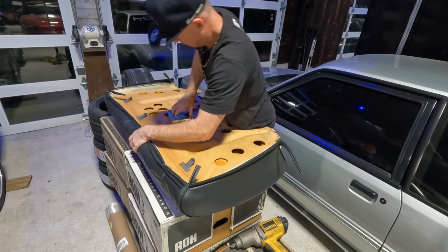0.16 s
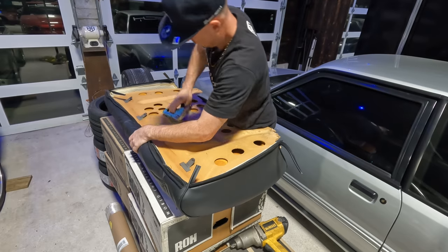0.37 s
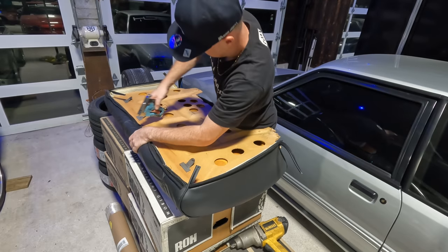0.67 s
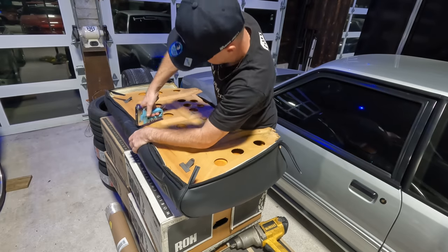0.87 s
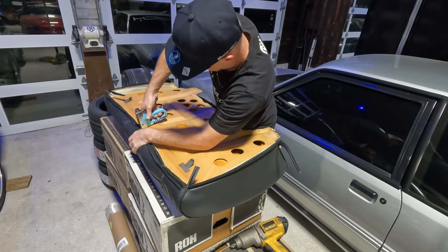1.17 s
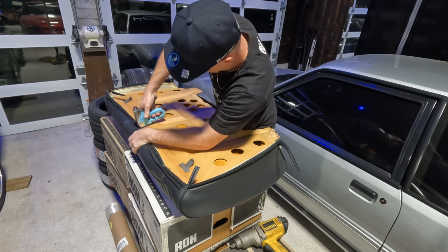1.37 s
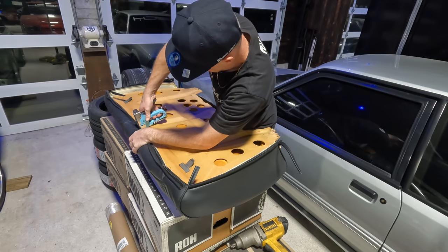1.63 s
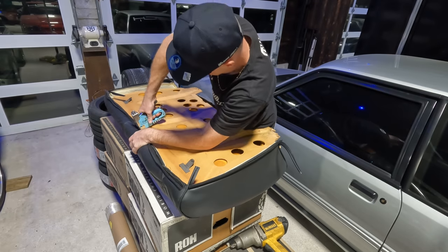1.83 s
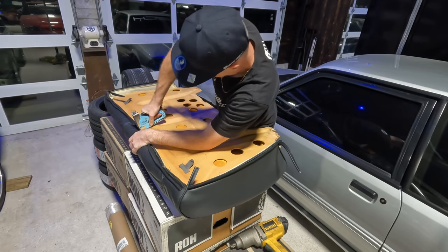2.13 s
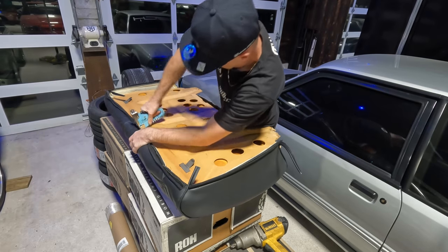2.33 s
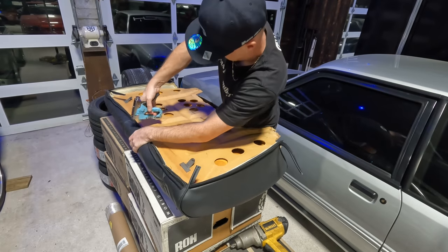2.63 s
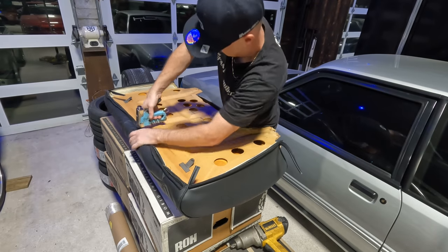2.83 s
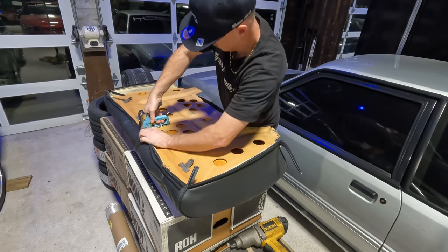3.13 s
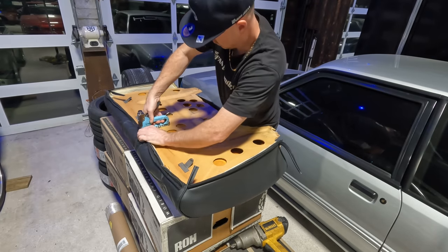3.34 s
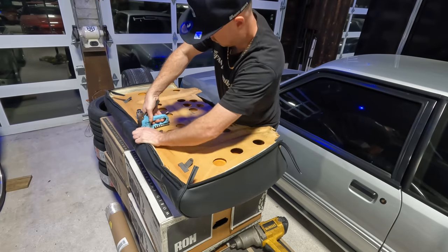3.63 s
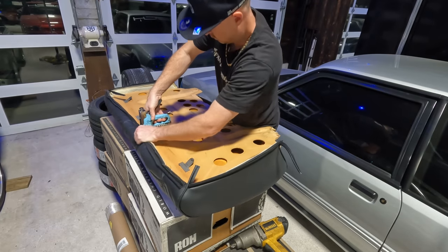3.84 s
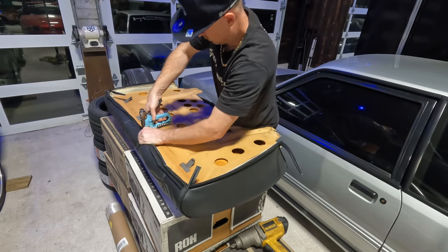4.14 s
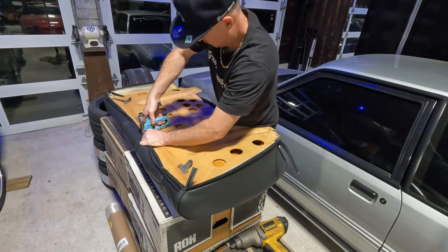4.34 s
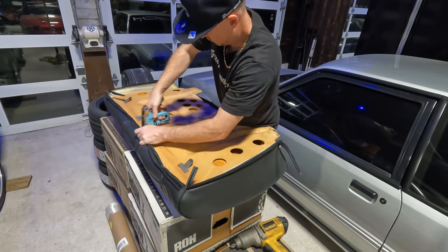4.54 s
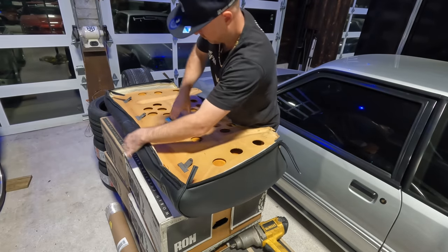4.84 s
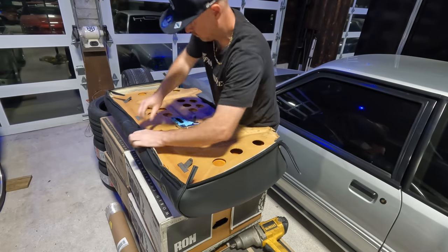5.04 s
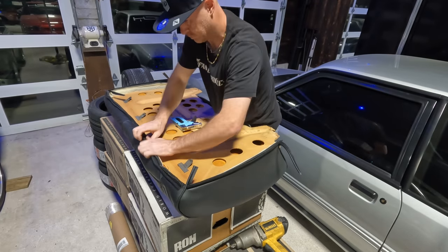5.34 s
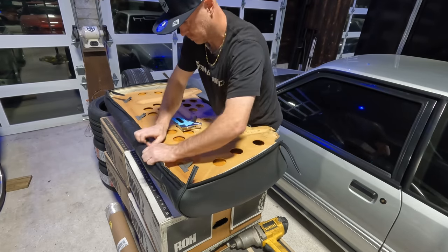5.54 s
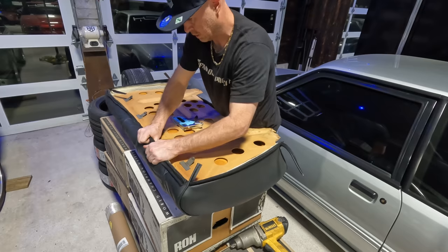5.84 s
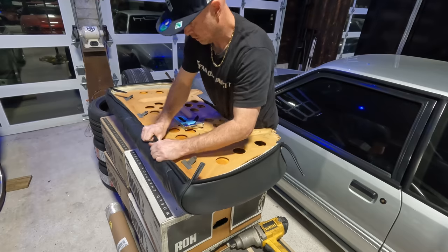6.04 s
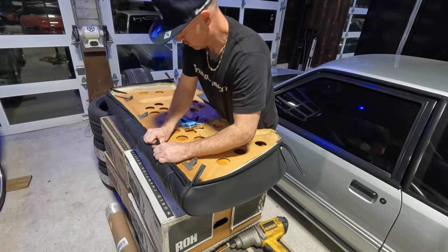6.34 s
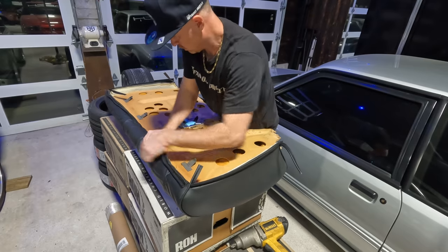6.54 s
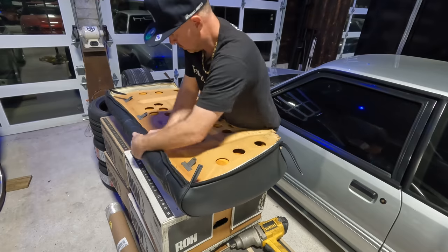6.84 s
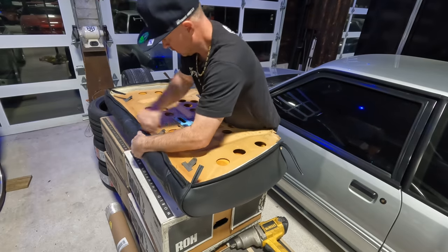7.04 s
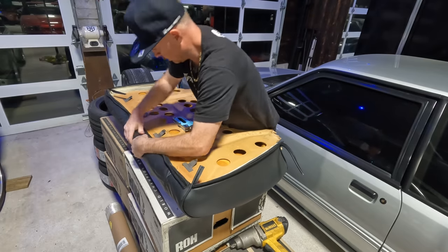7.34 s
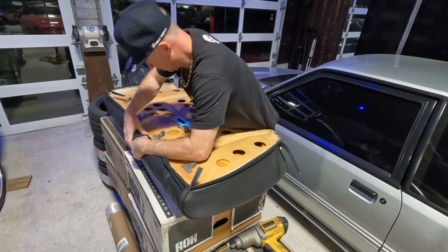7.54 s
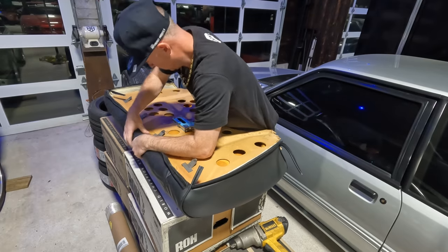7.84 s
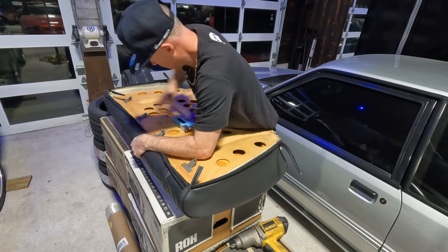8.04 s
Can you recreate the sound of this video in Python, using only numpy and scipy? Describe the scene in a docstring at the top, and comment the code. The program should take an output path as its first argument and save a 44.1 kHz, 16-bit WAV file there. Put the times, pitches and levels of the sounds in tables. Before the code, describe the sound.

A close stereo sound in a garage with low rumble, a soft deep hum, faint hiss and weak short reverberation. From 0.1 to 0.4 s a staple gun shifts on a hollow padded board with small knocks, the last strongest; lighter knocks follow at 0.6, 1.1 and 1.3 s. At 2.13 s steel clacks brightly as it is cocked, and at 2.3 s one hard, loud snap fires with a woody thump. The lever scrapes back until 2.6 s, clicks, and a thin spring hiss fades. Knocks come at 2.8 and 3.1 s, a rattling cluster at 3.6 s, and a dull thump at 4.3 s. From 4.8 to 5.1 s the gun clatters down heavily. After soft rustling, vinyl creaks in rapid grainy slips from 5.8 to 6.6 s, with a few more near 7 s. Light knocks and rubbing at 7.3 and 7.7 s fade out by about 8.2 s.

```python
"""Staple gun on a padded board

A hand staple gun in a garage is set down and shifted on a hollow padded board, cocked, fired once and released.
Hands drag vinyl tight over the board's edge, where it creaks in quick slips; rumble, hum and faint hiss fill the room.
Knocks, clacks and slips are short pushes ringing resonances; rubbing is patchy noise and pulse trains through them.
The lever and the air are noise shaped by spectra, the spring is noise through coil resonances, and noise tails echo.
"""
import sys
import numpy as np
from scipy import signal
from scipy.fft import rfft, irfft, next_fast_len
from scipy.io import wavfile
from scipy.ndimage import uniform_filter1d, map_coordinates

SR = 44100
rng = np.random.default_rng(int(sys.argv[2]) if len(sys.argv) > 2 else 0)


def persist_wave(psi):
    """Save psi, clipped to +-1, as 16-bit WAV."""
    counts = np.round(np.clip(psi, -1, 1) * 32767).astype(np.int16)
    wavfile.write(sys.argv[1], SR, np.atleast_2d(counts).T)


N = 361619  # samples, 8.2 s


def amp(db):
    """Decibel law: the amplitude gain of a level in dB."""
    return 10 ** (np.asarray(db) / 20)


def unit(x):
    """Normalisation of energy: x scaled to rms 1."""
    return x / np.sqrt(np.mean(x ** 2) + 1e-20)


def along(points, hz):
    """Logarithmic frequency scale: (Hz, value) points joined by straight lines over log frequency."""
    f, v = np.transpose(points)
    return np.interp(np.log(hz + 1), np.log(f + 1), v)


def curves(rows):
    """Level envelopes: each column after the time, -120 before the first row and held after the last."""
    s, *columns = np.transpose(rows)
    return [np.interp(np.arange(N) / SR, s, c, -120, c[-1]) for c in columns]


def wobble(rate):
    """Slow random modulation: a smooth curve through normal random knots, rate of them a second."""
    knots = rng.standard_normal(int(N * rate / SR) + 4)
    return map_coordinates(knots, [np.arange(N) * rate / SR])


def filtered(x, response):
    """Linear filtering: the spectrum of x times a complex response of frequency."""
    size = next_fast_len(N + SR // 2)
    return irfft(rfft(x, size) * response(np.fft.rfftfreq(size, 1 / SR)), size)[..., :N]


def coloured(x, spectrum):
    """Spectral shaping: x through a (Hz, dB) curve."""
    return filtered(x, lambda hz: amp(along(spectrum, hz)))


def modal(modes):
    """Modal superposition: the summed response of (Hz, width Hz, dB) resonances, alternating in sign."""
    return lambda f: sum((-1) ** k * amp(db) * 1j * f * w / (c * c - f * f + 1j * f * w)
                         for k, (c, w, db) in enumerate(modes))


def resonant(x, modes):
    """Forced resonance: x through modes, scaled so that a unit pulse peaks at 1."""
    ringing = irfft(modal(modes)(np.fft.rfftfreq(SR, 1 / SR)))
    return filtered(x, modal(modes)) / np.abs(ringing).max()


def spot(modes, hz, loss_db, share):
    """Modal excitation: a contact favours modes near hz (loss_db at an octave) in a band share * hz wide."""
    band = modal([(hz, share * hz, 0)])
    return lambda f: band(f) * sum(modal([(c, w, db - loss_db * np.log2(c / hz) ** 2)])(f)
                                   for c, w, db in modes)


def soft(hz):
    """Contact compliance: a yielding contact has no hard edge, a second-order low-pass."""
    return lambda f: 1 / (1 + 1j * f / hz) ** 2


def add(track, s, sound):
    """Superposition: mixes a sound in at s seconds."""
    part = track[round(s * SR):][:len(sound)]
    part += sound[:len(part)]


def burst(t60, rise=0.0001):
    """Transient excitation: noise of energy 1 decaying exponentially over t60, cut off at 0.05 s."""
    t = np.arange(SR // 20) / SR
    puff = amp(-60 * t / t60) * (1 - np.exp(-t / rise)) * rng.standard_normal(len(t))
    return puff / np.linalg.norm(puff)


def strike(push, *responses):
    """Impulse response: a push through a chain of responses, scaled so that the sound peaks at 1."""
    size = 8192
    hz = np.fft.rfftfreq(size, 1 / SR)
    chain = np.prod([response(hz) for response in responses], axis=0)
    sound = irfft(rfft(push, size) * chain)[:size * 3 // 4]
    return sound / np.abs(sound).max()


# Treble spectrum of hard contacts. Each row: frequency in Hz, relative level in dB.
CLICK_SPECTRUM = [(1760, -14.5), (3200, -2), (5300, -5.5), (7500, -11.5), (10800, -19), (14000, -29.5),
                  (15500, -75.5)]


def tick(t60, tilt_db=0):
    """Hard contact: a very short burst of treble, tilted by tilt_db an octave."""
    return strike(burst(t60, 0.00036), lambda hz: amp(along(CLICK_SPECTRUM, hz) + tilt_db * np.log2(hz + 1)))


def patchy(depth_db):
    """Surface roughness: noise whose colour shifts in small patches, as an uneven surface gives it."""
    z = signal.stft(rng.standard_normal(N), nperseg=256)[2]
    field = rng.standard_normal(z.shape)
    field = uniform_filter1d(field, size=3, axis=0)  # patches over frequency
    field = uniform_filter1d(field, size=6, axis=1)  # and over time
    return signal.istft(z * amp(depth_db * unit(field)), nperseg=256)[1][:N]


def grains(rate, spread_db):
    """Relaxation oscillation: one-sided pulses at an uneven pace, sizes scattered, the train at rms 1."""
    count = np.floor(np.cumsum(rate / SR * amp(4.5 * wobble(150))))
    sizes = amp(spread_db * rng.standard_normal(N))
    return -unit(np.diff(count, prepend=0) * sizes)


# How unlike the two ports hear diffuse sound. Each row: frequency in Hz, side signal as a share of the mid.
SIDE_SHARE = [(30, 0.76), (200, 0.16), (1000, 0.49), (8000, 0.72), (12000, 1.5)]


def ports(pair):
    """Diffuse-field coherence: shared mid plus or minus an independent side give left and right."""
    size = pair.shape[1]
    side = irfft(rfft(pair[1]) * along(SIDE_SHARE, np.fft.rfftfreq(size, 1 / SR)), size)
    return np.array([pair[0] + side, pair[0] - side])


# Rumble and hiss of the room. Each row: frequency in Hz, relative level in dB.
AIR_SPECTRUM = [(8, -8), (24, -5), (53, -3.5), (93, -37), (147, -7.5), (193, -13.5), (267, -16), (570, -30),
                (856, -37), (1280, -26), (3900, -47), (6340, -40.5), (8780, -41.5), (11800, -45),
                (15500, -76)]
AIR_DB, HUM_DB, HUM_HZ = -59.5, -52.5, 30  # middle of the wavering rms level, of the hum's peak, and its pitch


def air():
    """Partly coherent background noise: shaped rumble and hiss, with a wavering hum alike in both ports."""
    noise = ports(coloured(rng.standard_normal((2, N)), AIR_SPECTRUM))
    phase = 2 * np.pi * HUM_HZ * np.arange(N) / SR + 0.57 * wobble(1.0)
    hum = amp(HUM_DB + 0.88 * wobble(3.5)) * np.sin(phase)
    return amp(AIR_DB + 2 * wobble(1.1)) * unit(noise) + hum


def swell(start, length, rise, t60):
    """Exponential build-up and decay: power that rises, holds for length and dies away."""
    t = np.arange(N - round(start * SR)) / SR
    t = t[t < length + 1]
    fade = amp(-60 * np.maximum(t - length, 0) / t60)
    return ((1 - np.exp(-t / rise)) * fade) ** 2


# Hands, gun and vinyl rubbing over the board, with the cocking lever's hiss and the recoil's drumming.
# Each row: start in seconds, length in seconds, scrape in dB, drumming in dB, rustle in dB, share of the
# scrape's power that goes into slips (0-1).
STROKES = [(0.113, 0.22, -72, -64, -64.5, 0.8), (0.542, 0.15, -66, -72, -67, 0.6),
           (0.71, 0.025, -75, -58, -70, 0.4), (1.496, 0.23, -77, -76, -70.5, 0.6),
           (1.84, 0.37, -71, -89, -67.5, 0.5), (2.124, 0.024, -55, -38.5, -28, 0.1),
           (2.308, 0.075, -51, -33.5, -45, 0.4), (2.549, 0.18, -51, -75, -49, 0.76),
           (2.775, 0.46, -60, -58, -60.5, 0.27), (3.369, 0.35, -63.5, -63, -93, 0.48),
           (3.62, 0.32, -62.5, -54, -61, 0.5), (3.91, 0.12, -44.5, -39.5, -62, 0.06),
           (4.09, 0.053, -48.5, -42, -58, 0.07), (4.211, 0.082, -60.5, -57, -63.5, 0.06),
           (4.301, 0.043, -66, -32, -48.5, 0.1), (4.427, 0.2, -61.5, -53, -66, 0.06),
           (4.627, 0.17, -57.5, -55.5, -60, 0.47), (4.84, 0.16, -53, -38.5, -57.5, 0),
           (5.125, 0.46, -63.5, -72, -56, 0.76), (5.623, 0.17, -52.5, -60.5, -56, 0.44),
           (5.795, 0.43, -42, -41, -62.5, 0.23), (6.134, 0.072, -36.5, -45, -60, 0.45),
           (6.278, 0.15, -56, -42.5, -61.5, 0.1), (6.471, 0.11, -39.5, -38.5, -51.5, 0.72),
           (6.647, 0.13, -86, -63, -80, 0.5), (6.902, 0.14, -45, -45.5, -53.5, 0.15),
           (7.205, 0.056, -60.5, -52.5, -61.5, 0), (7.293, 0.011, -39, -34.5, -43.5, 0.17),
           (7.37, 0.24, -64.5, -63.5, -64.5, 0.3), (7.677, 0.065, -52, -54, -62.5, 0.07),
           (7.82, 0.082, -51.5, -48.5, -56.5, 0.33), (7.917, 0.044, -72, -66, -63.5, 0.3),
           (8.048, 0.2, -72.5, -72, -78, 0.44)]
# Unrest after a knock, first chatter, then drumming. Each row: level in dB relative to the knock (chatter)
# or thump (drumming), decay t60 in seconds.
SHUDDER = [(-16.5, 0.12), (-13, 0.16)]
# Hands lying on the work, a single row: scrape in dB, drumming in dB, rustle in dB.
RESTING = (-85.5, -77.5, -78.5)
STROKE_RISE_S, STROKE_T60_S, CONTACT_RISE_S = 0.019, 0.29, 0.003


def rubbing():
    """Addition of powers: amplitudes of slips, scrape, drumming and rustle from strokes, knocks and resting."""
    power = np.zeros((4, N))
    slips, scrape, drumming, rustle = power
    power[1:] += amp(RESTING)[:, None] ** 2
    for s, length, scrape_db, drum_db, rustle_db, grip in STROKES:
        shape = swell(s, length, STROKE_RISE_S, STROKE_T60_S)
        add(slips, s, grip * amp(2 * scrape_db) * shape)
        add(scrape, s, (1 - grip) * amp(2 * scrape_db) * shape)
        add(drumming, s, amp(2 * drum_db) * shape)
        add(rustle, s, amp(2 * rustle_db) * shape)
    (chatter_db, chatter_t60), (after_db, after_t60) = SHUDDER
    for s, thump_db, _, _, knock_db, _, _ in KNOCKS:
        add(scrape, s, amp(2 * (knock_db + chatter_db)) * swell(s, 0, CONTACT_RISE_S, chatter_t60))
        add(drumming, s, amp(2 * (thump_db + after_db)) * swell(s, 0, CONTACT_RISE_S, after_t60))
    return np.sqrt(power)


# The hollow board's low, middle and high groups of modes. Each row: frequency in Hz, width in Hz,
# relative level in dB.
BOARD_MODES = [
    [(158, 34, -1.5), (219.6, 41.5, 6.5), (269.5, 30.2, 7), (333, 28, -2.5)],
    [(398, 80, -6.5), (514, 89, -9.5), (661, 92, -7.5)],
    [(920, 450, 9), (1038, 120, 7.5), (1300, 960, -3), (1690, 130, -5), (2005, 94, 2.5), (2420, 460, -3),
     (3060, 730, -5.5)],
]


def drumming(amount):
    """Forced vibration: patchy noise drives the hollow board's low and middle modes."""
    low, middle, _ = BOARD_MODES
    return amount * amp(0.77 * wobble(25)) * unit(resonant(patchy(depth_db=2.0), low + middle))


# Board and cover under friction. Each row: frequency in Hz, width in Hz, relative level in dB.
RUBBED_MODES = [(625, 220, -11), (1056, 167, 5), (1464, 640, -0.5), (2170, 660, -4), (3230, 1900, -14.5)]
# Treble of the rustle. Each row: frequency in Hz, relative level in dB.
RUSTLE_SPECTRUM = [(1760, -11.5), (3000, -7), (4100, -11), (5150, -5.5), (5850, -8), (6600, -8),
                   (8240, -10.5), (10800, -16), (14000, -24), (15500, -72.5)]


def friction(scrape, rustle):
    """Sliding friction: patchy noise rings board and cover in a fluttering scrape; more of it rustles above."""
    flutter = amp(1.8 * wobble(60))
    scraping = unit(resonant(patchy(depth_db=3.5), RUBBED_MODES))
    rustling = unit(coloured(patchy(depth_db=2.0), RUSTLE_SPECTRUM))
    return flutter * scrape * scraping + rustle * rustling


# The taut vinyl sheet. Each row: frequency in Hz, width in Hz, relative level in dB.
VINYL_MODES = [(940, 320, -3), (1770, 910, 4.5), (2570, 820, 4)]
SLIP_RATE, SLIP_SPREAD_DB = 165, 4.5  # median slips a second, scatter of their sizes


def creak(amount):
    """Stick-slip: a train of small releases, each pulling the sheet and tugging board and cover."""
    tugged = lambda f: modal(VINYL_MODES)(f) + amp(-3.0) * modal(RUBBED_MODES)(f)
    slips = filtered(grains(SLIP_RATE, SLIP_SPREAD_DB), soft(hz=2400))
    return amount * unit(filtered(slips, tugged))


# Gun and hands knocking the board. Each row: time in seconds, thump peak in dB, pitch favoured by the thump
# in Hz, body peak in dB, knock peak in dB, pitch favoured by the knock in Hz, tick peak in dB.
KNOCKS = [(0.134, -60, 190, -63, -49.5, 1580, -49), (0.201, -49.3, 210, -52, -32.5, 1960, -37.5),
          (0.274, -33.5, 297, -46, -30.5, 1340, -43), (0.2932, -36, 240, -40, -34.5, 2030, -35),
          (0.342, -45, 270, -49, -36, 2000, -52), (0.353, -54, 270, -39, -35, 2010, -39),
          (0.364, -23, 288, -24, -18.5, 1580, -30), (0.608, -64, 200, -74, -40.5, 2200, -35.5),
          (0.71, -51, 199, -60, -39, 2630, -39), (0.731, -45, 200, -53, -49, 1620, -60),
          (1.071, -30, 244, -38.5, -29, 1450, -33.5), (1.339, -38, 278, -56, -41.5, 1810, -42),
          (1.518, -51, 222, -68, -45.5, 1580, -52), (2.284, -52, 200, -41, -30, 790, -40),
          (2.294, -39, 256, -22, -20, 825, -35.4), (2.3052, -14.5, 234, -16.5, -10.5, 1110, -9.5),
          (2.824, -38.5, 187, -51, -36, 2040, -39), (2.879, -37, 220, -51, -31, 1700, -33.5),
          (3.11, -26.5, 244, -29.5, -22.5, 1440, -40), (3.594, -47.5, 218, -49.5, -20, 1580, -36),
          (3.607, -29.8, 244, -33.5, -17.5, 1425, -22), (3.628, -38, 210, -36.5, -22.5, 1630, -26),
          (3.673, -33, 240, -32, -20.5, 1294, -32), (3.692, -43, 210, -30, -23.5, 1680, -26),
          (3.763, -37, 205, -35.5, -22.5, 1340, -25), (4.153, -39.5, 230, -42, -29.5, 1240, -45),
          (4.302, -33, 249, -50.5, -34, 1350, -49), (4.328, -16.5, 188, -25, -18, 1350, -28),
          (4.464, -39, 200, -57.5, -54, 1000, -69), (4.549, -35.5, 220, -51, -40.5, 1200, -58),
          (4.679, -51.5, 209, -61, -33, 1990, -37), (4.719, -45, 232, -51, -37, 2160, -32.5),
          (4.831, -21, 218, -26, -19, 1750, -25), (4.854, -34, 186, -39, -26.5, 1720, -33),
          (4.894, -45, 230, -40, -30, 1800, -33), (4.936, -23.5, 220, -30, -17, 1100, -31),
          (4.961, -24, 231, -31, -25, 1400, -32), (4.992, -22, 223, -13, -9.5, 1880, -39),
          (5.0, -13, 200, -27, -12.5, 1340, -13.5), (5.029, -16.5, 228, -39, -17.5, 1310, -38),
          (5.071, -18.5, 297, -22, -17, 900, -25), (5.078, -34, 230, -32.5, -20, 1480, -28),
          (5.38, -65.5, 211, -53, -37, 1930, -44), (6.814, -36, 231, -52, -32, 1390, -46),
          (7.187, -41.1, 192, -67, -43, 1310, -64), (7.245, -38, 229, -50.5, -38, 1320, -53.5),
          (7.311, -37, 240, -41, -30.5, 1930, -27.5), (7.32, -28, 208, -32, -28.5, 1460, -32),
          (7.646, -52, 180, -68, -41.5, 1970, -42.5), (7.699, -32, 220, -40, -37, 1320, -42.5),
          (7.718, -41, 221, -44, -37.5, 1520, -40.5), (7.737, -33, 200.6, -46, -40, 1280, -56),
          (7.845, -44, 220.4, -48, -45, 1324, -61), (7.894, -50, 261, -44, -34.5, 1420, -40),
          (7.915, -41, 189, -34.5, -31.5, 1690, -34.5), (7.969, -38.5, 204, -54, -39.5, 1296, -44),
          (7.997, -38.5, 200, -65, -57, 1546, -59), (8.178, -53, 210, -65.5, -40.5, 1415, -53)]
HARD_HZ, HARD_TILT_DB = 1650, 5  # a knock an octave above this pitch tilts its tick up by so many dB an octave


def knocks():
    """Impact excitation: short pushes ring the board's three groups of modes; hard contact adds treble."""
    out = np.zeros(N)
    low, middle, high = BOARD_MODES
    for s, thump_db, thump_hz, body_db, knock_db, knock_hz, tick_db in KNOCKS:
        thump_spot = spot(low, thump_hz, loss_db=26.5, share=0.54)
        thump = strike(np.abs(burst(0.011, 0.0015)), thump_spot, soft(hz=407))
        body_band = modal([(550, 230, 0)])
        body = strike(np.abs(burst(0.0071, 0.0003)), modal(middle), body_band, soft(hz=1210))
        knock_spot = spot(high, knock_hz, loss_db=20.5, share=0.69)
        knock = strike(burst(0.0035, 0.0003), knock_spot, soft(hz=3220))
        add(out, s, amp(thump_db) * thump)
        add(out, s, amp(body_db) * body)
        add(out, s, amp(knock_db) * knock)
        add(out, s, amp(tick_db) * tick(0.011, HARD_TILT_DB * np.log2(knock_hz / HARD_HZ)))
    return out


# The bench shaken by heavy blows. Each row: time in seconds, peak in dB.
JOLTS = [(0.364, -35), (1.072, -46), (2.305, -35), (3.117, -40), (4.326, -38), (4.372, -33.5), (4.414, -49),
         (4.833, -25.5), (4.993, -22.5), (5.071, -28.5), (6.948, -38), (7.317, -34), (7.703, -37.5),
         (7.734, -41.5), (7.773, -40), (7.86, -41), (7.913, -38)]
# Modes of the bench. Each row: frequency in Hz, width in Hz, relative level in dB.
BENCH_MODES = [(66.4, 30, -4.5), (50.5, 14, -6.5)]


def bench():
    """Low-frequency structural resonance: a shudder of the bench under each heavy blow."""
    out = np.zeros(N)
    for s, db in JOLTS:
        add(out, s, amp(db) * strike(burst(0.12, 0.0049), modal(BENCH_MODES), soft(hz=150)))
    return out


# Steel parts of the gun clacking. Each row: time in seconds, peaks of the low, middle, high and top modes
# in dB (four columns), rattle decay t60 in seconds.
CLACKS = [(1.941, -51, -50.5, -65.5, -55, 0.12), (2.1318, -35.5, -21, -15, -19.5, 0.014),
          (2.142, -18.5, -14, -11.5, -8, 0.025), (2.149, -21.5, -12, -15, -13.5, 0.015),
          (2.164, -43, -30, -25.5, -41.5, 0.011), (2.1999, -28.5, -22, -41.5, -43, 0.088),
          (2.3033, -28.5, -19.5, -22.5, -10.5, 0.022), (2.548, -33.5, -37, -31, -41.5, 0.015),
          (2.5666, -23, -27.5, -38, -31, 0.022), (2.573, -20, -26, -30.5, -38.5, 0.021),
          (2.59, -19, -18.5, -9, -8, 0.0069), (2.729, -33, -26.5, -44, -46, 0.019),
          (2.806, -51.5, -44, -49.2, -52.7, 0.0067)]
# The gun frame's low, middle, high and top groups of modes. Each row: frequency in Hz, width in Hz,
# relative level in dB.
STEEL_MODES = [
    [(1370, 570, 0.5), (1440, 340, 10), (1920, 66, -3.5)],
    [(2560, 680, -3), (3120, 100, 4.5), (3440, 75, -2), (4100, 290, -3)],
    [(4356, 73, -5.5), (5100, 840, 2)],
    [(6120, 390, 3), (7380, 570, -0.5), (11000, 5200, -10.5)],
]


def clacks():
    """Impact of stiff bodies: each clack is a short rattle into the frame's groups of modes."""
    out = np.zeros(N)
    for s, *parts_db, rattle_s in CLACKS:
        shake = burst(rattle_s, rattle_s / 80)
        for modes, db in zip(STEEL_MODES, parts_db):
            add(out, s, amp(db) * strike(shake, modal(modes)))
    return out


# Modes of the driver blade. Each row: start in seconds, frequency in Hz, width in Hz of each of two equal
# resonances in a chain, peak in dB.
SHOT = [(2.304, 5550, 418, -11), (2.304, 6920, 354, -17.5), (2.3044, 3970, 418, -8.5),
        (2.3038, 2810, 397, -13.5), (2.3053, 1430, 908, -3.5), (2.3047, 10220, 3000, -6.5)]


def shot():
    """Damped free vibration: a sudden blow sets each mode of the driver blade ringing at its own moment."""
    out = np.zeros(N)
    for s, hz, width, db in SHOT:
        ring = modal([(hz, width, 0)])
        add(out, s, amp(db) * strike(np.abs(burst(0.0004)), ring, ring))
    return out


# The shot's slow push of air, a single row: time in seconds, scale of the pulse in dB, time constant in seconds.
KICK = (2.3065, -23, 0.006)


def air_push():
    """Pressure pulse: displaced air gives one slow swing of pressure that reverses and dies out."""
    out = np.zeros(N)
    s, db, length = KICK
    u = np.arange(SR // 10) / SR / length
    add(out, s, -amp(db) * u * (2 - u) * np.exp(-u))
    return out


# The lever sliding back. Each row: time in seconds, level in dB.
LEVER = [(2.33, -52), (2.38, -39), (2.47, -34), (2.56, -38.5), (2.603, -84.5)]
# Colour of that slide. Each row: frequency in Hz, relative level in dB per Hz.
LEVER_SPECTRUM = [(240, -35), (400, -11), (452, -37), (495, -13), (1070, -9.5), (1850, -12.5), (2290, -19),
                  (3770, -19), (10700, -39.5), (15000, -52.5)]


def lever():
    """Sliding friction: patchy noise, coloured and unsteady, follows the lever's level as it slides back."""
    slide_db, = curves(LEVER)
    return amp(slide_db + 1.3 * wobble(92)) * unit(coloured(patchy(depth_db=-2.0), LEVER_SPECTRUM))


# The coil spring after the release: level in dB, then its modes. Each row of the modes: frequency in Hz,
# width in Hz of each of two passes, relative level in dB of each pass.
SPRING = (-36.5, [(5960, 220, -2.5), (6400, 197, 1), (6470, 270, -8.5)])
SPRING_S, SPRING_T60_S = 2.598, 0.44


def spring():
    """Exponential decay: noise through the coil's resonances twice hisses after the release and dies away."""
    since = np.maximum(np.arange(N) / SR - SPRING_S, 0)
    db, coils = SPRING
    hiss = unit(resonant(resonant(rng.standard_normal(N), coils), coils))
    return amp(db - 60 * since / SPRING_T60_S) * (1 - np.exp(-since / 0.013)) * hiss


# The loudest slips of the vinyl. Each row: time in seconds, peak in dB, pitch favoured in Hz, tick peak in dB.
SLIPS = [(5.8296, -33, 1260, -48.3), (5.8378, -29, 1210, -51), (5.8458, -26, 1260, -46),
         (5.8541, -23.5, 1140, -50), (5.865, -23, 1430, -40), (5.9026, -20, 1800, -40),
         (5.913, -24, 1320, -49), (5.9307, -20, 1350, -38), (5.937, -29, 1180, -51),
         (5.9473, -24, 1310, -46), (5.958, -27, 1350, -44), (5.965, -21, 1310, -44.1),
         (5.976, -37, 1400, -45.5), (5.992, -21, 1900, -42), (5.9962, -25, 1500, -50),
         (6.011, -23.5, 1280, -45), (6.023, -26, 1120, -44), (6.0274, -24.5, 1700, -39),
         (6.0316, -21.5, 1240, -38), (6.048, -18, 1650, -36), (6.0618, -26, 1160, -37),
         (6.0715, -21.5, 1600, -39), (6.075, -24, 1530, -44.2), (6.095, -32, 1580, -42),
         (6.1163, -21.5, 1240, -37), (6.125, -21, 1710, -39), (6.1585, -23, 1890, -32),
         (6.1665, -25, 1450, -32), (6.187, -25, 1400, -38), (6.1941, -21, 1670, -38),
         (6.2023, -29, 1820, -29), (6.211, -28, 1390, -30), (6.2192, -29, 1250, -30),
         (6.2286, -19, 1710, -27.5), (6.239, -31, 1280, -38), (6.2492, -23.5, 1390, -32),
         (6.2803, -20.5, 1800, -23), (6.309, -23, 1770, -36), (6.3384, -21, 1810, -37),
         (6.342, -18.5, 2000, -24.5), (6.3578, -24, 2180, -37), (6.4858, -18, 1690, -29),
         (6.4995, -29, 1770, -47.2), (6.508, -23, 1540, -31), (6.5336, -39, 1510, -47),
         (6.547, -19.5, 1660, -32), (6.5637, -20, 1700, -27), (6.5793, -22, 1660, -36),
         (6.6047, -28, 1710, -30), (6.6995, -35, 1850, -45), (6.754, -29.5, 2070, -57.5),
         (6.7762, -35.5, 1380, -54), (6.8747, -37.5, 1390, -52.5), (6.949, -27.5, 1485, -50),
         (6.962, -23.5, 1890, -48), (6.97, -29, 1750, -50), (6.985, -29.5, 1600, -45),
         (7.007, -38, 1610, -36)]


def loud_slips():
    """Stick-slip: each sudden release is one short pull on sheet, board and cover, with a tick of treble."""
    out = np.zeros(N)
    for s, db, hz, tick_db in SLIPS:
        place = spot(VINYL_MODES + RUBBED_MODES, hz, loss_db=7, share=0.77)
        add(out, s, amp(db) * strike(np.abs(burst(0.0012)), place, soft(hz=5000)))
        add(out, s, amp(tick_db) * tick(0.0062))
    return out


# Reverberation of the garage. Each row: frequency in Hz, decay t60 in seconds.
GARAGE_T60 = [(100, 0.8), (400, 0.45), (2000, 0.57), (10000, 0.32)]


def garage(x):
    """Reverberation: a fresh noise tail every third of a second, decaying by frequency, mostly alike in both ports."""
    out, step = np.zeros((2, N + SR)), SR // 3
    for start in range(0, N, step):
        hz, t, z = signal.stft(rng.standard_normal((2, SR // 2)), SR, nperseg=256)
        decay = amp(-60 * t / along(GARAGE_T60, hz)[:, None])
        pair = signal.istft(z * decay, SR, nperseg=256)[1]
        tail = ports(pair) / np.linalg.norm(pair[0])
        echo = signal.fftconvolve(x[None, start:start + step], tail, axes=1)
        out[:, start:start + echo.shape[1]] += echo
    return np.pad(out, ((0, 0), (SR // 200, 0)))[:, :N]  # echoes start 5 ms late


def scene():
    """Direct and reverberant sound: the work lies close and the room answers weakly."""
    background = air()
    slip_amount, scrape, drum_amount, rustle = rubbing()
    wood = drumming(drum_amount) + knocks()
    sheet = friction(scrape, rustle) + creak(slip_amount) + loud_slips()
    steel = clacks() + shot() + lever() + spring()
    to_room = amp(-8.0) * wood + amp(-11.5) * sheet + amp(-12.5) * filtered(steel, soft(hz=16000))
    return background + wood + sheet + bench() + steel + air_push() + garage(to_room)


# Response of both ports. Each row: frequency in Hz, gain in dB.
MIC_RESPONSE = [(20, -1), (7000, 1), (8500, -9.5), (12000, -3), (14000, -15.5), (15800, -31.5)]
# Left over right. Each row: frequency in Hz, level difference in dB.
LEVEL_LEAN = [(60, -2.5), (250, -3.5), (1000, -1.5), (4000, 0.5), (10000, 2)]
# Left ahead of right. Each row: frequency in Hz, phase difference in radians.
PHASE_LEAD = [(100, -0.08), (1400, -0.29), (3400, -0.69), (5500, -0.52), (7600, -0.43), (10500, -0.05)]
TOP_HZ = 15800  # band limit


def record(dry):
    """Transduction: ports differ in level and phase, treble droops, peaks saturate, the band is limited."""
    half = np.array([[.5], [-.5]])  # left and right take half of each difference
    level = lambda hz: amp(along(MIC_RESPONSE, hz) + half * along(LEVEL_LEAN, hz))
    heard = filtered(dry, lambda hz: level(hz) * np.exp(1j * half * along(PHASE_LEAD, hz)))
    flattened = heard / (1 + np.abs(heard) ** 8) ** (1 / 8)
    return filtered(flattened, lambda hz: hz < TOP_HZ)


dry = scene()
out = record(dry)
persist_wave(out)
```